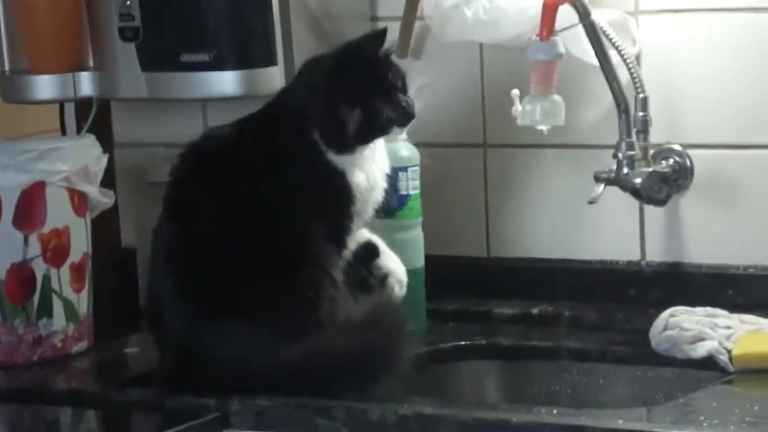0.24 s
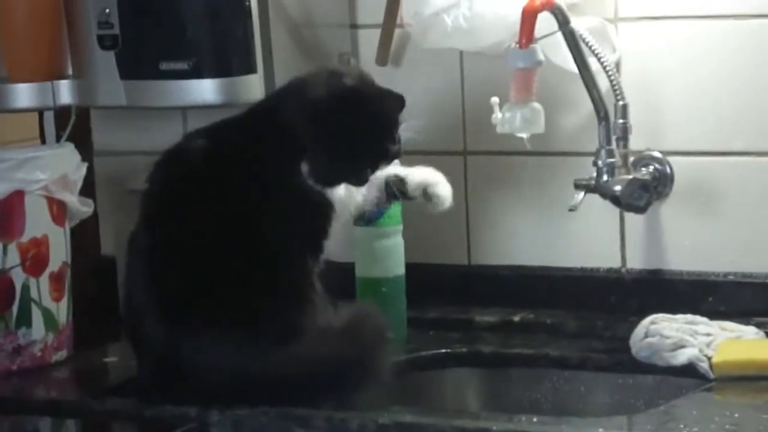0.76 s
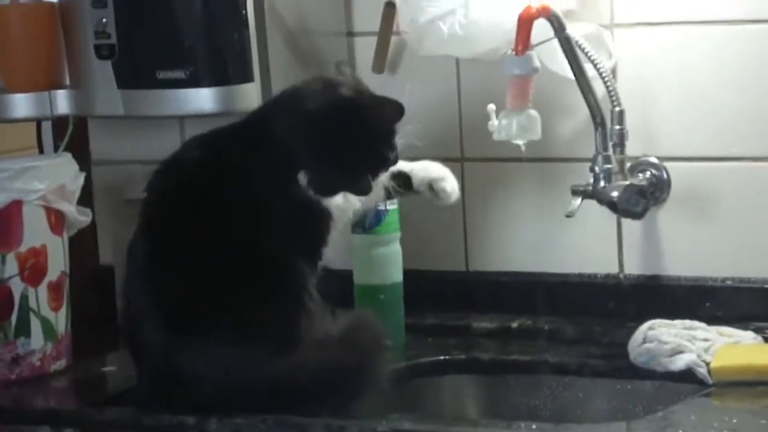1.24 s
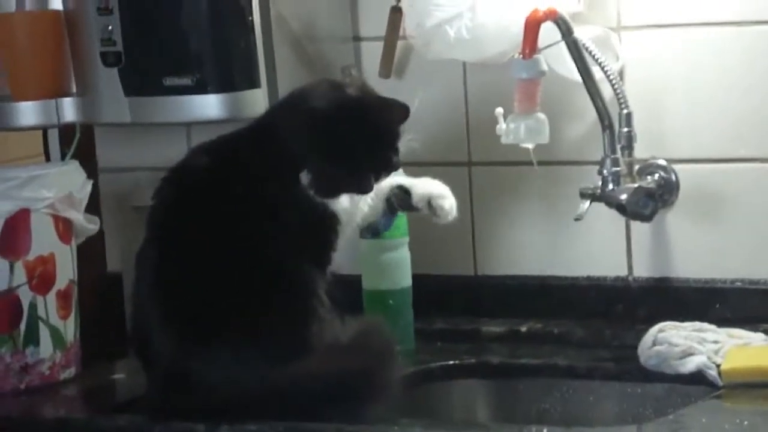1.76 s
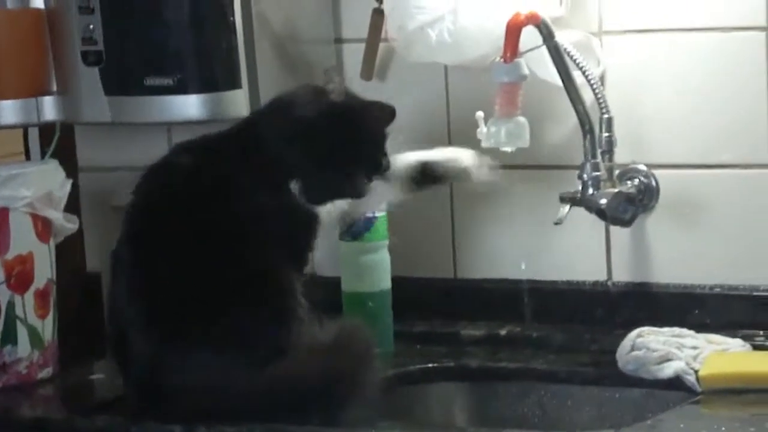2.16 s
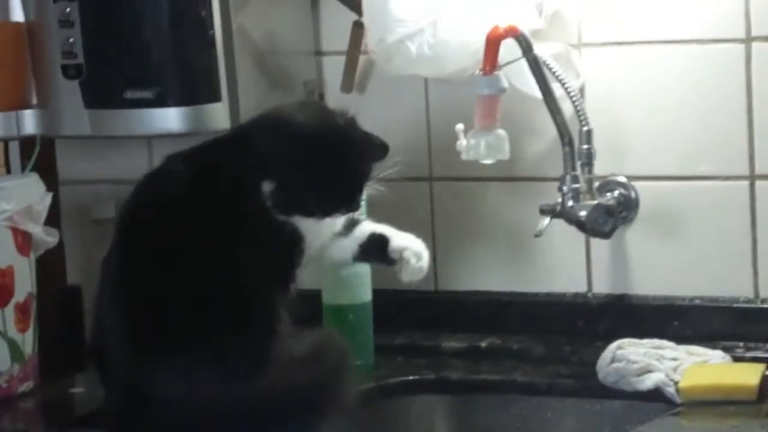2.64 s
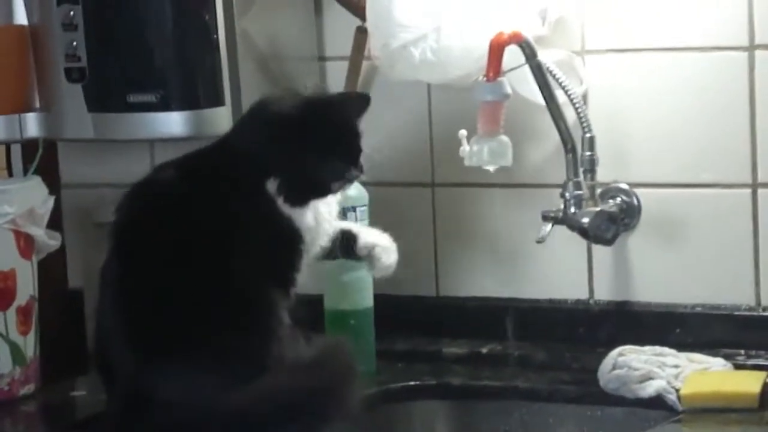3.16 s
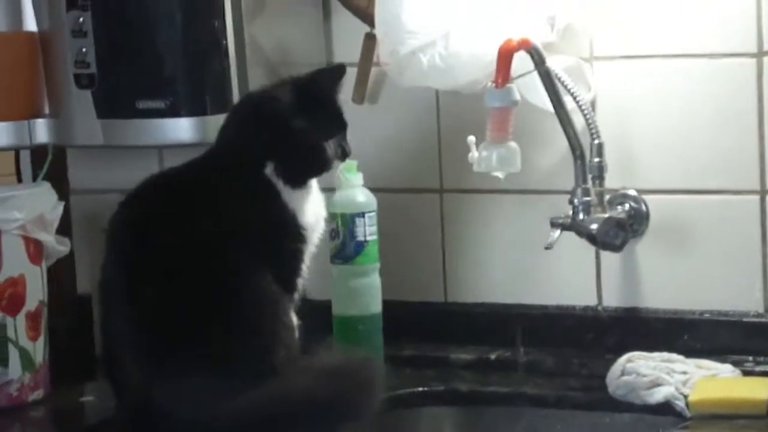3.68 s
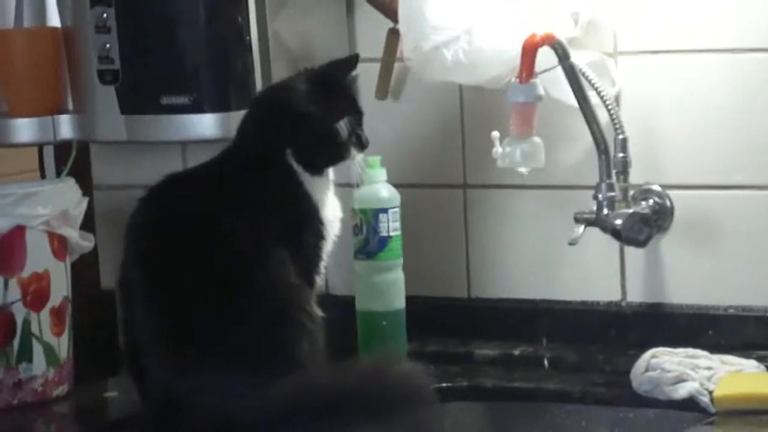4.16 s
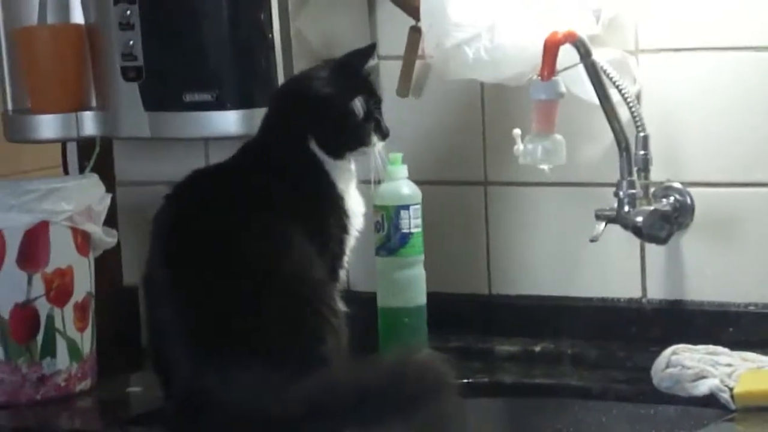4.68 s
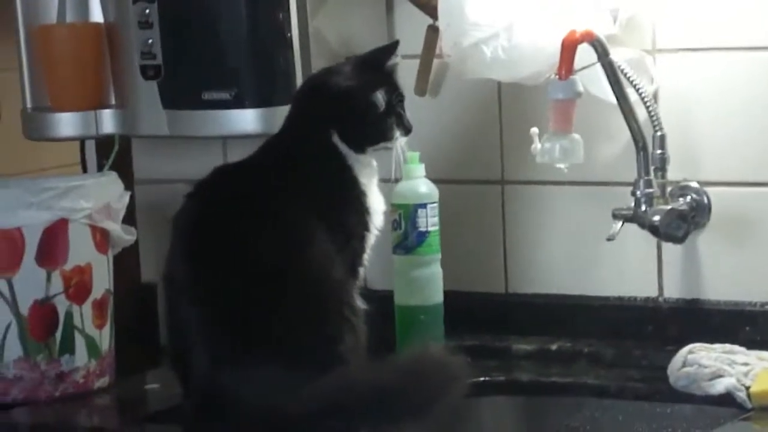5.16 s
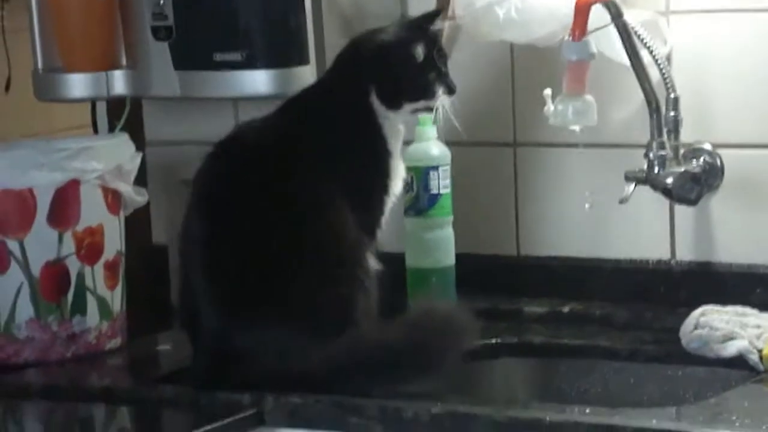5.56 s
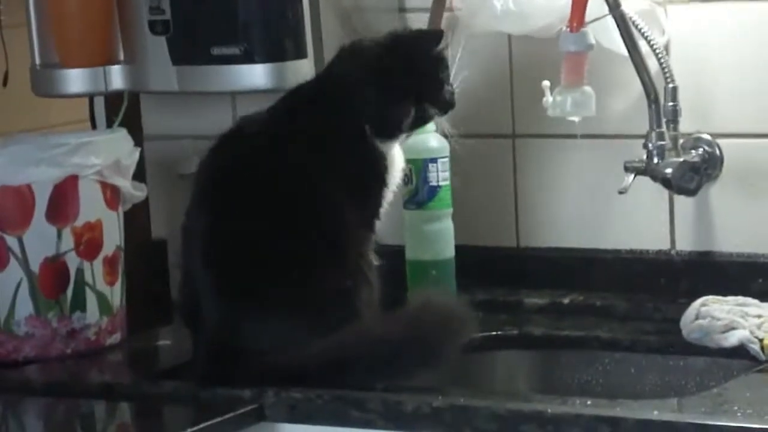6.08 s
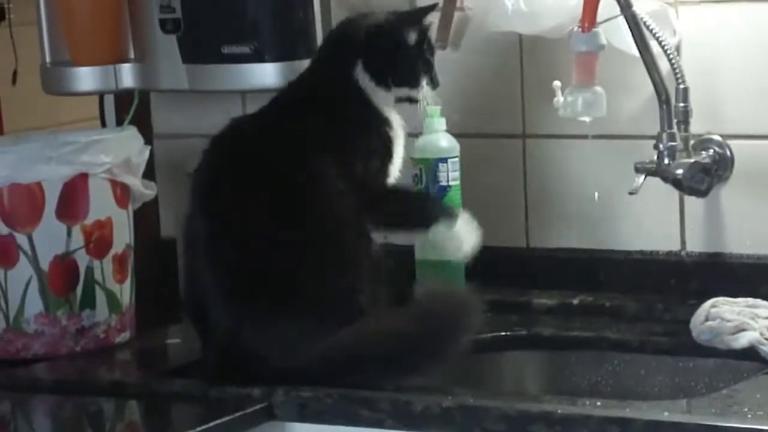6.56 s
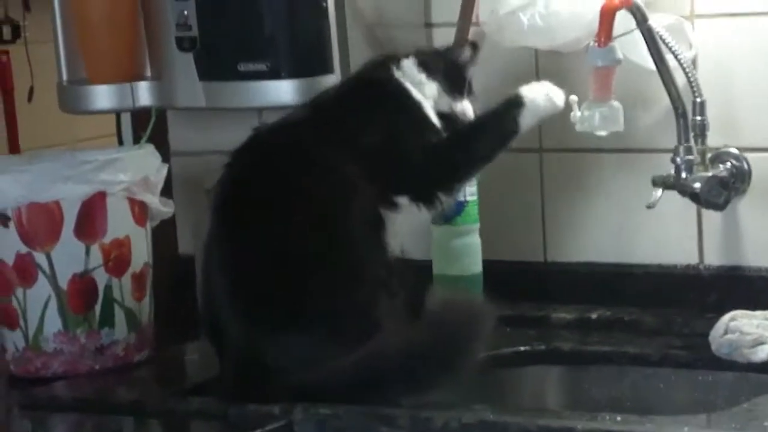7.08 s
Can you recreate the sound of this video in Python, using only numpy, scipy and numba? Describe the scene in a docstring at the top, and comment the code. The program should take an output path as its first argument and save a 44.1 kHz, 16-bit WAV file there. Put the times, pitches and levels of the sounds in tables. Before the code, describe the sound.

A thin, broken thread of tap water dribbles into a shallow puddle in a steel kitchen sink, sparse at first, then bubbling steadily.

```python
"""A thin, broken thread of tap water falls into a steel kitchen sink with a shallow puddle, a metre from a phone.
Larger drops trap air pockets: decaying sines near 1 kHz. Small bubbles are gliding sines, mostly upwards.
Droplets ping and splat on the steel under hissing noise; pockets, bubbles and taps thump the basin resonances.
A paw knocks the thread aside at 2.62 s; near 3.4 s the level dips briefly and returns at a lower gain.
Short noise echoes make the tiled kitchen, and faint low noise its hum; the two microphone ports differ slightly."""
import sys
import numpy as np
from scipy import signal
from scipy.fft import rfft, irfft
from scipy.io import wavfile
from scipy.ndimage import uniform_filter1d
from numba import njit

SR = 44100
rng = np.random.default_rng(int(sys.argv[2]) if len(sys.argv) > 2 else 0)


def transcribe(signal):
    """Save signal, clipped to [-1, 1], as a 16-bit WAV file at the path in sys.argv[1]."""
    frames = np.atleast_2d(signal).T
    limited = np.clip(frames, -1, 1)
    pcm = np.round(limited * 32767).astype(np.int16)
    wavfile.write(sys.argv[1], SR, pcm)


N = 322812

# Levels in the tables are relative, ahead of the mix and the output gain.
# large air pockets closing in the puddle: t/s, level/dB, f/Hz
AIR_POCKETS = [(0.029, -23.5, 1340), (0.042, -26, 1230), (0.305, -31, 1370), (0.3235, -24.5, 1330),
               (0.349, -26, 1263), (0.536, -19, 1350), (0.5392, -12, 1230), (0.571, -36, 1230),
               (0.649, -39, 1190), (0.6883, -21.5, 1130), (0.712, -26, 1280), (.731, -33, 1530),
               (0.775, -34, 1870), (0.8284, -23.5, 1380), (1.43, -37, 1360), (1.448, -34.5, 1117),
               (1.992, -32.5, 1070), (2.077, -19, 1275), (2.398, -36, 1450), (2.416, -26.5, 1496),
               (2.433, -31, 1540), (2.7459, -23.5, 980), (2.807, -30, 1610), (2.856, -30, 1400),
               (2.9701, -17.5, 1190), (2.9852, -25, 945), (3.027, -36, 1520), (3.09, -30, 950),
               (3.155, -30, 1040), (3.188, -34.5, 1036), (3.234, -37.5, 1076), (3.5374, -13, 1240),
               (3.557, -10.5, 1030), (3.628, -20, 1020), (3.6514, -10, 1150), (3.664, -19, 1060),
               (3.7773, -20.5, 1030), (3.8016, -19, 970), (3.8349, -15, 950), (3.8592, -20, 884),
               (3.999, -8.5, 1210), (4.018, -10.5, 996), (4.135, -12, 990), (4.146, -19, 1073),
               (4.1708, -8, 940), (4.2369, -8, 1285), (4.251, -10, 1100), (4.2573, -8.5, 1230),
               (4.2829, -7, 995), (4.295, -10, 990), (4.315, -18, 1150), (4.343, -8, 1125),
               (4.369, -19, 1190), (4.4127, -2.5, 964), (4.4248, -15, 1140), (4.446, -22, 1010),
               (4.465, -29, 1170), (4.4788, -6, 1045), (4.5676, -6.5, 1150), (4.5773, -14, 894),
               (4.6072, -12, 1050), (4.663, -6, 1100), (4.681, -9.5, 974), (4.7033, -15, 1065),
               (4.7168, -18, 1120), (4.7619, -6.5, 1100), (4.7806, -18, 860), (4.8169, -10, 950),
               (4.839, -8, 990), (4.8891, -12, 1024), (4.9515, -5, 1084), (4.991, -12, 1134),
               (5.016, -32, 1140), (5.029, -12.5, 1130), (5.093, -30, 1170), (5.1082, -11.5, 1074),
               (5.1339, -17, 1080), (5.1483, -17, 970), (5.2428, -12.5, 1100), (5.277, -9, 1036),
               (5.3123, -16, 1016), (5.376, -37, 1090), (5.4, -18, 985), (5.446, -11.5, 976),
               (5.476, -19, 1160), (5.5086, -11, 960), (5.5235, -9.5, 980), (5.5515, -22, 900),
               (5.569, -11, 890), (5.583, -17, 970), (5.594, -14, 1094), (5.6064, -11.5, 1000),
               (5.634, -9, 1270), (5.7, -10.5, 1160), (5.763, -20.5, 1090), (5.836, -17, 1180),
               (5.863, -23, 1120), (5.881, -24, 1090), (5.911, -13.5, 1050), (5.92, -24, 980),
               (5.9677, -14.5, 1030), (6.0518, -11, 1070), (6.064, -12.5, 1030), (6.154, -12, 960),
               (6.242, -16.5, 1000), (6.2999, -12, 1024), (6.4907, -23, 1220), (6.517, -3, 1196),
               (6.652, -18, 1164), (6.7916, -16.5, 1300), (7.1038, -12, 1290), (7.2498, -15.5, 1263),
               (7.2716, -14, 1150)]
# small bubbles: t/s, level/dB, starting f/Hz, ring time/ms, rise over the ring/octaves
CHIRPS = [(0.077, -32, 5100, 20, 1), (0.1673, -40.5, 3820, 29, 5), (0.2752, -28.5, 2960, 14, 1.5),
          (0.3123, -25.5, 4160, 2.9, 0.5), (0.4036, -28.5, 1630, 19, 0.4), (0.425, -36.5, 4200, 18, 0.5),
          (0.4669, -35, 2960, 22, 1), (0.533, -24, 4360, 30, 1.6), (0.536, -24.5, 6210, 8.7, 0.6),
          (0.585, -42, 1950, 26, 6), (.66, -34, 3400, 19, 1), (.722, -37, 2020, 36, 4),
          (0.745, -38.5, 3500, 29, 4.5), (0.757, -32, 1550, 22, 1.5), (0.799, -39.5, 2620, 41, 8),
          (0.878, -42, 2150, 43, 2.5), (0.8262, -32.5, 3320, 10, 1), (1.007, -25, 4560, 13, 1.5),
          (1.01, -23, 3500, 6.9, -2), (1.087, -32.5, 2230, 23, 1.5), (1.148, -25, 1525, 37.5, 3.5),
          (1.1906, -17.5, 4050, 19, 2), (1.208, -31, 3820, 5.5, 2.5), (1.255, -32, 6050, 13, 3),
          (1.254, -25.5, 2970, 16, -0.5), (1.269, -29.5, 2810, 24, 1), (1.2998, -29, 2650, 34, 2.5),
          (1.368, -38, 1790, 37, 0.5), (1.5246, -17, 3760, 3.1, -1), (1.5492, -32.5, 2580, 15, 2),
          (1.549, -21, 1395, 29, 1.5), (1.6983, -28, 1770, 8.2, 3.5), (1.749, -22, 2720, 2.7, 3),
          (1.8441, -23, 2980, 10.3, 2.5), (1.945, -19.5, 2530, 1.3, -3), (1.9821, -29, 2980, 29, -0.5),
          (2.0799, -17, 2200, 2.2, 0.5), (2.111, -38, 2820, 56, 1.5), (2.1517, -23.5, 2080, 4.4, 1),
          (2.1665, -24.5, 1690, 29, 1), (2.237, -33, 1580, 49, 1), (2.332, -24, 3600, 2.5, 4),
          (2.5234, -24.5, 1690, 22, -0.5), (2.534, -31, 1560, 12, -1.5), (2.6258, -20.5, 5440, 3, 8),
          (2.6588, -29, 2900, 9.7, -0.5), (2.6814, -24.5, 1540, 14, 1), (2.6839, -31.5, 4440, 16, 0.4),
          (2.7435, -29, 1910, 6.5, 1), (2.9739, -23, 2910, 21, 0.7), (3.147, -25, 4530, 17, 3),
          (3.1681, -27, 2330, 5.2, -2), (3.298, -35, 1850, 30, 0.2), (3.317, -36, 1575, 83, 0.5),
          (3.335, -29, 1580, 26, 0), (3.343, -31, 1460, 19, 0), (3.4216, -35, 1900, 30, 5),
          (3.52, -23, 3900, 27, 3), (3.629, -22.5, 1980, 22, -0.5), (3.63, -16.5, 4400, 15, 1.6),
          (3.65, -21, 2160, 82, 7), (3.7826, -15.5, 4820, 17, 0.5), (3.823, -21.5, 1630, 14, 1.3),
          (3.9703, -16.5, 2550, 31, 3), (4.007, -18, 3180, 7.9, -0.5), (4.05, -23.5, 1920, 33, 2.5),
          (4.1336, -14, 1970, 13, 2), (4.169, -20, 4760, 5.7, -3), (4.1705, -20.5, 3940, 25, 0.5),
          (4.1996, -19.5, 5100, 22, 2.7), (4.371, -30, 2420, 35, 0.5), (4.4459, -17.5, 3000, 3.2, 4),
          (4.48, -22.5, 2900, 38, 1.5), (4.567, -21, 3090, 32, 8.5), (4.6813, -15, 5200, 9.2, 1),
          (4.7093, -12.5, 2530, 3.9, 1.5), (4.779, -19, 3440, 16, 0), (4.8155, -19, 5560, 12, -0.5),
          (4.8414, -9.5, 3640, 14.4, 4), (4.953, -12, 2740, 4.8, 0.5), (5.164, -23.5, 4290, 26, 1.3),
          (5.2128, -18.5, 3420, 36, 3.5), (5.3145, -17.5, 3910, 24, 0.7), (5.399, -26.5, 3120, 32, 1),
          (5.3968, -23, 4140, 26, 2.5), (5.4795, -22.5, 2240, 14, 2), (5.5245, -16, 3320, 9.1, 1.5),
          (5.65, -30.5, 1870, 74, 8), (5.701, -18, 2700, 35, 1.8), (5.75, -29.5, 3900, 17, 0),
          (5.765, -25, 1810, 23, 3), (5.789, -30, 3050, 30, 1), (5.863, -23, 1650, 43, 2.5),
          (5.8644, -9.5, 3080, 24.3, 3.5), (5.912, -28, 1820, 31, 3), (5.93, -24, 3060, 26, 3),
          (5.9384, -26, 2870, 57, 3.5), (5.967, -21.5, 1680, 30, 2.5), (5.986, -27, 1820, 26, 2),
          (6.0127, -24.5, 2670, 18, 2.5), (6.088, -27, 1780, 55, 1), (6.069, -26, 2050, 46, 4.5),
          (6.124, -19, 2420, 7.3, 0.5), (6.153, -18, 3480, 18, 0.9), (6.2415, -18, 2800, 25, 3),
          (6.307, -26.5, 3100, 47, 0.98), (6.331, -31, 1470, 60, 4.5), (6.363, -22.5, 3090, 23, 0.5),
          (6.496, -25, 2940, 25, 3), (6.5925, -29, 2000, 57, 5.5), (6.79, -21.5, 2950, 12, -0.5),
          (6.8772, -28, 3780, 36, 1.5), (6.9121, -11, 4360, 3.1, -1), (6.97, -23, 2600, 23, 3.5),
          (6.9875, -13, 1710, 20, 1.1), (7.0694, -14.5, 4140, 8.9, 1), (7.088, -32, 5930, 16, 1.5),
          (7.1363, -23.5, 1810, 48, 4.5), (7.139, -20, 4430, 5.7, 0.0), (7.2745, -16, 4850, 10.4, 0)]
# droplets ticking on wet steel: t/s, level/dB, f/Hz, ring time/ms
STEEL_TICKS = [(0.312, -31, 11500, 2.7), (0.346, -30.5, 14200, 0.47), (0.53, -31.5, 9800, 1.9),
               (0.532, -28.5, 14300, 2.7), (0.5958, -43, 9650, 5.5), (0.971, -33.5, 7060, 1.9),
               (1.015, -30, 11500, 2.9), (1.17, -28, 10260.0, 1.1), (1.1889, -22, 9700, 1.1),
               (1.254, -32.5, 12000, 1.6), (1.5906, -34.5, 11300, 4.4), (1.8436, -26, 11400, 1.9),
               (2.0309, -25.5, 14500, 0.46), (2.2824, -34, 9100, 5.3), (2.286, -27.5, 9440, 5.8),
               (2.3126, -27, 7400, 1.7), (2.8025, -31, 8650, 1.7), (2.8574, -27.5, 9450, 2.4),
               (2.9464, -29, 9500, 1.7), (3.071, -27.5, 14100, 1.7), (3.0914, -17, 8750, 1.6),
               (3.1224, -31.5, 11100, 4.4), (3.134, -32, 7300, 3.7), (3.3039, -29, 10660, 3.6),
               (3.5314, -21.5, 9800, 2.1), (3.5886, -21.5, 12900, 4.7), (3.653, -18, 14000, 1.4),
               (3.865, -20, 10530, 5.5), (3.8726, -17, 12370.0, 1.1), (4.029, -29, 8000, 5.8),
               (4.076, -23, 8100, 3.8), (4.1991, -19.5, 10400, 3.9), (4.345, -15, 11160, 3.7),
               (4.479, -24.5, 9900, 3.4), (4.568, -18, 7560, 3.5), (4.6652, -19.5, 10600, 5.7),
               (4.973, -26.5, 7940, 9), (5.03, -20.5, 9900, 1.4), (5.212, -19, 14600, 1.1),
               (5.378, -20, 10450, 4.3), (5.3976, -21, 9600, 2.8), (5.476, -25, 9300, 1.4),
               (5.552, -20, 9100, 1.1), (5.5934, -20, 9500, 2), (6.141, -26.5, 9900, 3.9),
               (6.362, -23.5, 12000, 3), (6.4919, -21, 7000, 2.3), (6.551, -29, 9900, 11),
               (6.6528, -17, 10000, 1.5), (6.653, -24, 7200, 5), (6.7846, -14, 10060, 13.6),
               (7.2733, -27, 10000, 4.1), (7.316, -17.5, 9700, 0.49)]
# the thread swells and thins: t/s, fine spray level/dB, puddle churn level/dB, f of its air pockets/Hz
THREAD_FLOW = [(0., -53.5, -48, 1354), (.221, -72.5, -80, 1320), (.361, -57, -57.5, 1370),
               (.491, -67.5, -67, 1220), (.741, -59.5, -53.5, 1260), (1.031, -68, -77.5, 1620),
               (1.181, -54, -71, 1450), (1.401, -65.1, -59, 1435), (1.941, -59, -58.5, 1543),
               (2.301, -65, -54.5, 1540), (2.601, -65.5, -67.5, 1450), (2.681, -57, -47, 1455),
               (2.821, -57.5, -50, 1350), (3.321, -54.5, -48.5, 1355), (3.471, -58.5, -81, 1245),
               (3.751, -47.5, -48.5, 1033), (4.201, -46.5, -47, 1065), (4.531, -53, -50, 1077),
               (4.701, -50.5, -50.5, 1105), (5.551, -50, -44, 1039), (6.191, -54.5, -43.5, 1162),
               (6.501, -47, -43, 1208), (6.801, -56, -59.5, 1260), (7.32, -50.5, -49.5, 1306)]
# basin resonances: f/Hz, width/Hz, level before the dip/dB, level after it/dB
BASIN_MODES = [(233.5, 65, 5.5, 9.5), (290, 19.8, 9, 11.5), (358, 20.6, 5.5, 6), (476.5, 55, 6, 14.5),
               (609, 47, 2.5, 11.5), (678, 59, 5.5, -21), (1010, 67, -3, 17), (1118, 68, 4, 19.5),
               (1212, 18, 3, -4)]
# spectrum of the spray hiss: f/Hz, level per Hz/dB
SPRAY_SPECTRUM = [(880, -19), (1500, -3), (2740, -17), (3000, 2.5), (4780, 12.5), (6180, 4), (10000, 10.5),
                  (16000, -13)]
# spectrum of the film running down the steel: f/Hz, level per Hz/dB
WASH_SPECTRUM = [(900, -5), (1600, -13), (4500, 2), (7000, 25), (10000, 3), (16000, -8)]
# left-right difference between the microphone ports: f/Hz, width/Hz, level/dB
PORT_DIFFERENCE = [(860, 640, -22), (5100, 560, -21), (12200, 7600, -7)]
# spectrum of the kitchen hum: f/Hz, level per Hz/dB
KITCHEN_SPECTRUM = [(25, -16), (55, -3), (95, -11), (120, -1.5), (180, -12.5), (236, 3.5), (321, -11.5),
                    (474, -7.5), (644, -17), (700, -18.5), (910, -24), (1540, -120)]
# overall gain, held at its end values outside these times: t/s, level/dB
OUTPUT_GAIN = [(3.36, -5), (3.372, -45), (3.385, -47), (3.402, -39), (3.418, -13.5)]

TIME_S = np.arange(N) / SR
NUDGED_S, DIP_S = 2.62, 3.385  # a paw knocks the thread aside until the dip
NUDGED_DB = 3  # meanwhile it strikes barer steel and thumps the basin harder
# cycles in the ring of a typical pocket, its level, and dB of ring lost per dB of strength
GULP_CYCLES, GULP_TYPICAL_DB, GULP_SHORTEN = 37.8, -11.5, 0.17
# full pitch scatter in octaves at 1 kHz and its growth: a shallower puddle rings higher and more varied
POCKET_SPREAD, SPREAD_PER_OCTAVE = 0.459, 0.93
THUMP_FOLLOW = .5  # dB of thump per dB of strength
WASH_DB, WASH_FOLLOW = -36, 0.62  # the film swells less than the spray: dB per dB
HOLLOW_HZ, HOLLOW_WIDTH_HZ = 689, 85  # basin and puddle cancel here, except while the thread is knocked aside
ROOM_T60_S, ROOM_DULL_HZ, ROOM_DB = .09, 4000, -11
KITCHEN_DB, KITCHEN_AFTER_DB = -65.5, 7.5  # the raised hum offsets most of the lower gain after the dip
TOP_HZ = 15800


def gulps():
    """After the slap of the drop, each trapped air pocket rings near 1 kHz with a slight upward glide."""
    s, db, hz = np.transpose(AIR_POCKETS)
    ring_s = GULP_CYCLES / hz * undb(GULP_SHORTEN * (GULP_TYPICAL_DB - db))
    pockets = grains(N, s, undb(db), hz, ring_s, 0.038 + 0 * s, 0.031)
    slaps = band(splat(impacts(s, undb(db - 4.5)), 0.51), 1400, 2470)
    return pockets + slaps


def churn():
    """Many smaller pockets bubble roughly in the puddle, densest in level just after gulps and chirps."""
    _, churn_db, churn_hz = curves(THREAD_FLOW)
    churn_db = churn_db + splash([AIR_POCKETS, CHIRPS], 0.013, 25)
    spread = POCKET_SPREAD + SPREAD_PER_OCTAVE * np.log2(churn_hz / 1000)
    return undb(1.5) * patter(2600, churn_db, churn_hz, spread, 28.6, 5.62, 0.89)


def thump_blows(table):
    """Impulses on the steel, answering a strong drop less than in proportion."""
    s, db = np.transpose(table)[:2]
    return impacts(s, undb(GULP_TYPICAL_DB + THUMP_FOLLOW * (db - GULP_TYPICAL_DB)))


def basin():
    """Pockets, bubbles and small taps strike the resonances of the steel basin."""
    small_taps = taps(1200, curves(THREAD_FLOW)[1] + 22, 5.95)
    blows = thump_blows(AIR_POCKETS) + thump_blows(CHIRPS) + small_taps
    after_dip = TIME_S > DIP_S
    nudged = (TIME_S > NUDGED_S) & ~after_dip
    blows = blows * undb(NUDGED_DB * nudged)
    thumps = np.zeros(N)
    for k, (hz, width, before_db, after_db) in enumerate(BASIN_MODES):
        gain = undb(np.where(after_dip, after_db, before_db))
        thumps += (-1) ** k * gain * band(blows, hz, width)  # neighbouring modes in opposite sign
    return thumps


def bubbles():
    """A slap of the drop, then a gliding ring whose level wavers with the rippling surface."""
    s, db, hz, ms, octaves = np.transpose(CHIRPS)
    waver = undb(6.5 + 3.37 * walk(500))
    chirps = waver * grains(N, s, undb(db), hz, ms / 1000, octaves, 0.018)
    slaps = band(splat(impacts(s, undb(db - 8.5)), 0.53), 1700, 7200)
    return chirps + slaps


def spray():
    """Tiny bubbles, pings and splats over a fine hiss, in uneven flurries, strongest just after the ticks and
    chirps."""
    steady_db = curves(THREAD_FLOW)[0]
    flurries_db = 3 * walk(25)
    flow_db = steady_db + flurries_db + splash([STEEL_TICKS, CHIRPS], 0.0069, 29.1)
    hiss = undb(flow_db - 1.5) * coloured(SPRAY_SPECTRUM)
    fizz = undb(8.0) * patter(5000, flow_db, np.full(N, 3300.), 1.795, 36.7, 4.5, 2.23)
    # droplets land all over the basin, so each microphone port hears its own
    pings = [undb(18.5) * patter(700, flow_db, np.full(N, 10000.), 1.28, 56.0, 2.6, 1.0) for _ in range(2)]
    bare = splat(taps(600, flow_db + 8, 5.45), 1.0)
    splats = band(bare, 1760, 5200) + undb(-0.5) * band(bare, 9700, 3100)
    return hiss + fizz + np.array(pings) + splats


def wash():
    """The film running down the steel: smooth noise, independent at each port, following the thread."""
    wash_db = WASH_FOLLOW * curves(THREAD_FLOW)[0] + WASH_DB
    return undb(wash_db) * np.array([coloured(WASH_SPECTRUM), coloured(WASH_SPECTRUM)])


def ticks():
    """Short bright pings, each at its own left-right level; the less one rings, the more it splats."""
    s, db, hz, ms = np.transpose(STEEL_TICKS)
    pan_db = 3 * rng.standard_normal(len(s))
    splats = band(splat(impacts(s, undb(db + 5.0 - 0.84 * ms)), 0.87), 10200, 3500)
    pings = [grains(N, s, undb(db + 16.5 + sign * pan_db / 2), hz, ms / 1000, 0 * s, 0.037)
             for sign in (1, -1)]
    return splats + np.array(pings)


def port_difference(mono):
    """The ports are close together: mostly short waves reach them differently."""
    wide = signal.fftconvolve(mono, echoes(0.0017))[:N]
    return sum(undb(db) * band(wide, hz, width) for hz, width, db in PORT_DIFFERENCE)


def room(mono):
    """Basin walls and tiles return short, dulled reflections."""
    dull = signal.lfilter(*signal.butter(1, ROOM_DULL_HZ, fs=SR), mono)
    return undb(ROOM_DB) * signal.fftconvolve(dull, echoes(ROOM_T60_S))[:N]


def kitchen(pair):
    """Faint low noise, mostly common to both ports, as the hum of the kitchen."""
    hum = coloured(KITCHEN_SPECTRUM) + .33 * pair * coloured(KITCHEN_SPECTRUM)
    return undb(KITCHEN_DB + KITCHEN_AFTER_DB * (TIME_S > DIP_S)) * hum


def patter(count, flow_db, centre_hz, spread, cycles, scatter_db, octaves):
    """Many small drops at random times, ring lengths and pitches (spread in octaves); few loud, few chirp."""
    when, pitch, luck, glide, ring = rng.random((count, 5)).T
    at = (when * N).astype(int)
    hz = centre_hz[at] * 2 ** (np.broadcast_to(spread, N)[at] * (pitch - .5))
    size = undb(flow_db[at] - scatter_db * np.log(1 - .98 * luck))
    ring_s = cycles * (0.23 + 2.21 * ring) / hz
    return grains(N, at / SR, size, hz, ring_s, octaves * glide ** 4, 0.048)


@njit
def grains(n, s, size, hz, t60, octaves, onset):
    """Decaying sines swell in over a share of their ring; rising ones glide up, hold, then burst."""
    out = np.zeros(n)
    for k in range(len(s)):
        start, length, phase = int(s[k] * SR), int(t60[k] * SR), 0.
        rise = max(octaves[k], 0.)
        for i in range(min(length, n - start)):
            u = i / length
            phase += min(hz[k] * 2 ** (octaves[k] * u), .45 * SR) / SR
            swell = np.sin(np.pi / 2 * min(u / onset, 1.)) ** 2
            # slower decay at first, then a sudden end, the more it rises towards the surface
            decay = 1000. ** -(u / (1 + rise / 2) + 6 * rise * u ** 3)
            out[start + i] += size[k] * swell * decay * np.sin(2 * np.pi * phase)
    return out


def impacts(s, size):
    """One impulse for each drop."""
    out = np.zeros(N)
    np.add.at(out, np.minimum((s * SR).astype(int), N - 1), size)
    return out


def taps(count, flow_db, scatter_db):
    """Bare impulses of small drops that trap no air."""
    when, luck = rng.random((count, 2)).T
    db = flow_db[(when * N).astype(int)] - scatter_db * np.log(1 - .98 * luck)
    return impacts(when * N / SR, undb(db))


def splat(blows, ms):
    """Each impulse becomes a short ragged noise burst, peaking after ms, as a drop flattens."""
    t = np.arange(int(.012 * SR)) / SR * 1000 / ms
    return signal.fftconvolve(blows, t * np.exp(1 - t))[:N] * rng.standard_normal(N)


def splash(tables, after_s, boost_db):
    """Extra dB, decaying over after_s, for the small drops thrown up by each big one."""
    s, db = np.transpose([row[:2] for table in tables for row in table])
    fade = np.exp(-1 / (after_s * SR))
    thrown = signal.lfilter([1], [1, -fade], impacts(s, undb(db)))
    return 20 * np.log10(1 + undb(boost_db) * thrown)


def echoes(t60):
    """Dense decaying noise reflections after a 1 ms gap, total energy 1."""
    t = np.arange(int(.3 * SR)) / SR
    tail = rng.standard_normal(len(t)) * 1000 ** (-t / t60) * (t > .001)
    return tail / np.sqrt(np.sum(tail ** 2))


def coloured(table):
    """Noise of RMS 1 with a spectrum of (f/Hz, level/dB) points."""
    hz, db = np.transpose(table)
    f = np.fft.rfftfreq(N, 1 / SR) + 1
    gain = undb(np.interp(np.log(f), np.log(hz), db))
    return level(irfft(rfft(rng.standard_normal(N)) * gain, N), 0)


def walk(rate):
    """Random levels held 1 / rate s and slewed; spread near 1."""
    k = int(SR / rate)
    return uniform_filter1d(np.repeat(rng.standard_normal(N // k + 1), k), k)[:N]


def curves(table):
    """Columns of a time table as straight lines between its points."""
    s, *columns = np.transpose(table)
    return [np.interp(TIME_S, s, c) for c in columns]


def band(x, hz, width):
    """Two-pole resonance, gain 1 at the centre."""
    return signal.lfilter(*signal.iirpeak(hz, hz / width, fs=SR), x)


def level(x, db):
    """Scale to an RMS level in dB."""
    return x * undb(db) / np.sqrt(np.mean(x ** 2))


def undb(db):
    """Amplitude factor of a level in dB."""
    return 10 ** (np.asarray(db) / 20)


def scene():
    """The water at two close microphone ports, then its reflections and the kitchen behind."""
    water = gulps() + churn() + basin() + bubbles() + spray() + wash() + ticks()
    # small sources radiate no deep bass
    water = signal.sosfilt(signal.butter(3, 190, "high", fs=SR, output="sos"), water)
    not_nudged = np.abs(TIME_S - (NUDGED_S + DIP_S) / 2) > (DIP_S - NUDGED_S) / 2
    water = water - not_nudged * band(water, HOLLOW_HZ, HOLLOW_WIDTH_HZ)
    mono = water.mean(axis=0)
    pair = np.array([[1], [-1]])  # opposite sign left and right
    return water + room(mono) + pair * port_difference(mono) + kitchen(pair)


def record(dry):
    """The gain dips briefly and settles lower, then the top is cut."""
    faded = dry * undb(curves(OUTPUT_GAIN)[0])
    return signal.sosfilt(signal.ellip(10, .2, 70, TOP_HZ, fs=SR, output="sos"), faded)


dry = scene()
out = record(dry)
transcribe(out)
```